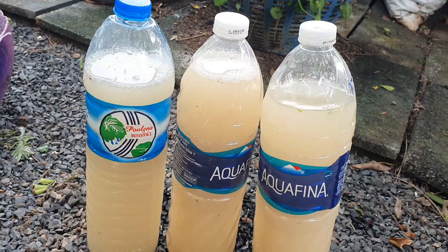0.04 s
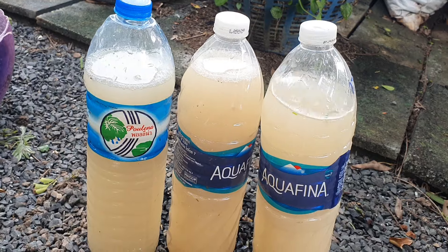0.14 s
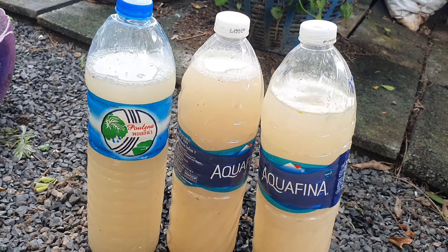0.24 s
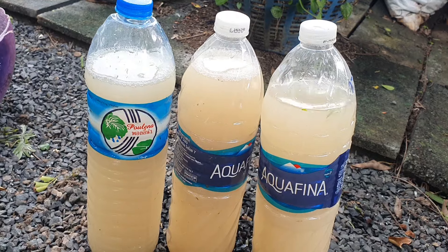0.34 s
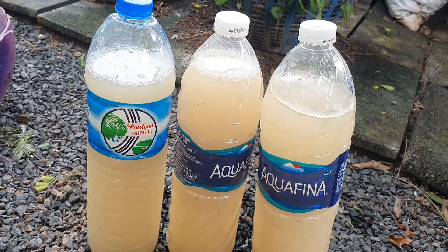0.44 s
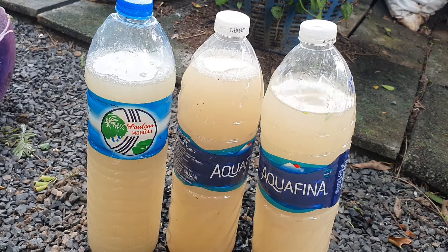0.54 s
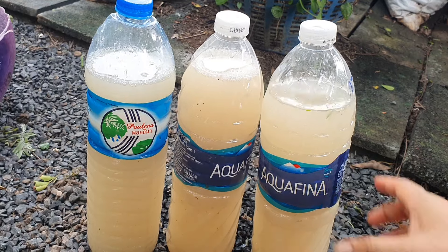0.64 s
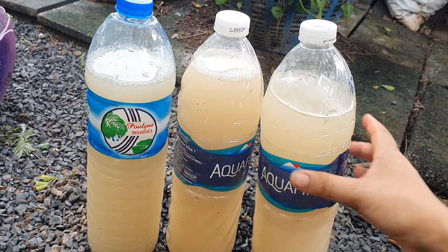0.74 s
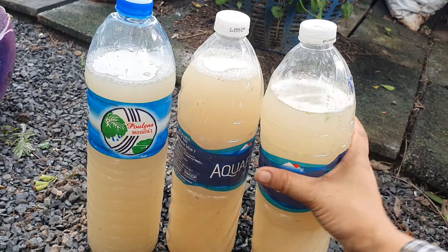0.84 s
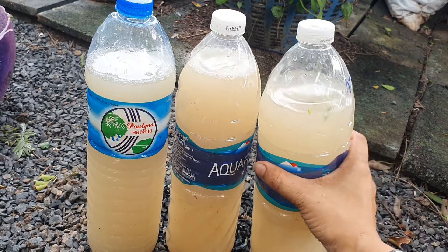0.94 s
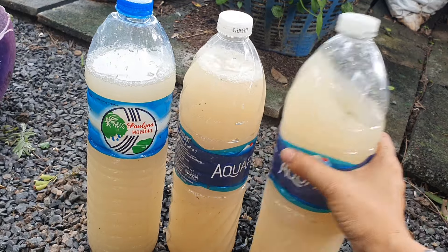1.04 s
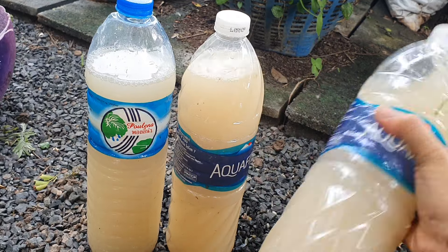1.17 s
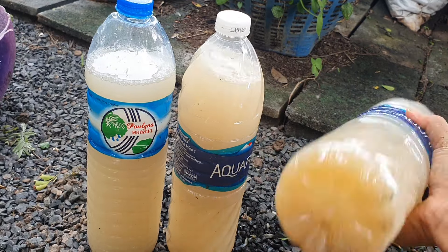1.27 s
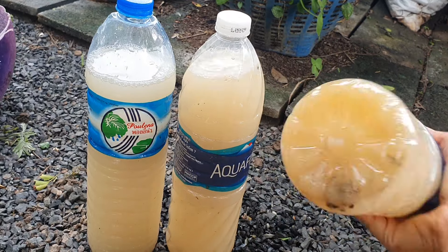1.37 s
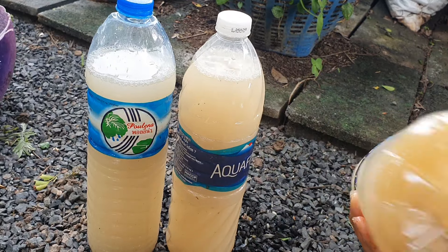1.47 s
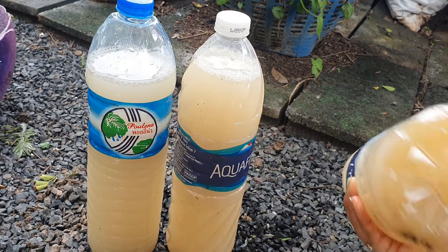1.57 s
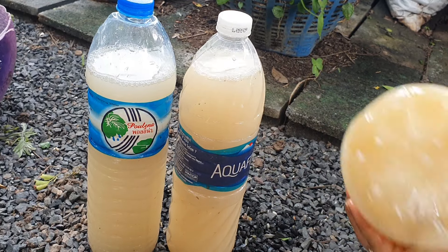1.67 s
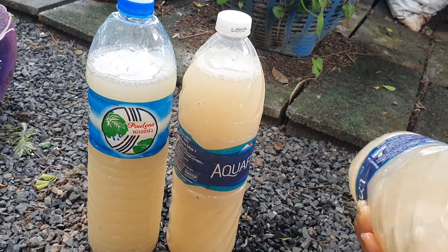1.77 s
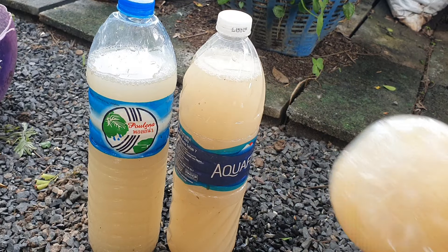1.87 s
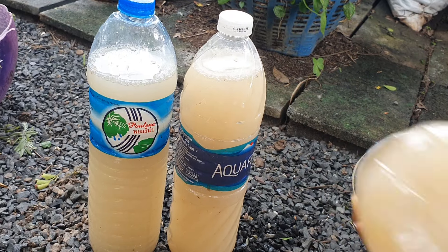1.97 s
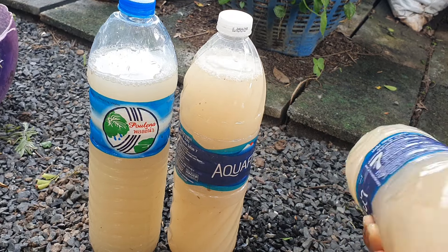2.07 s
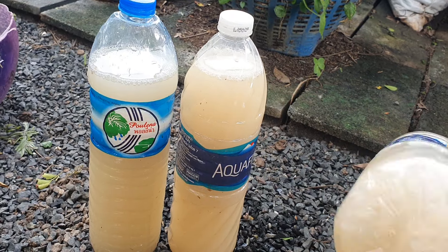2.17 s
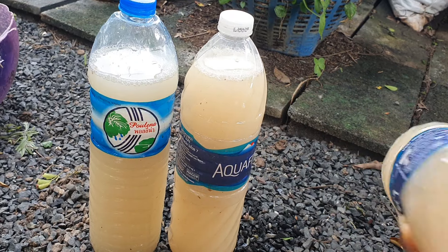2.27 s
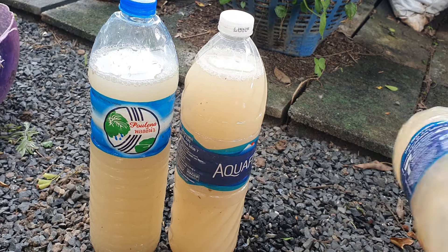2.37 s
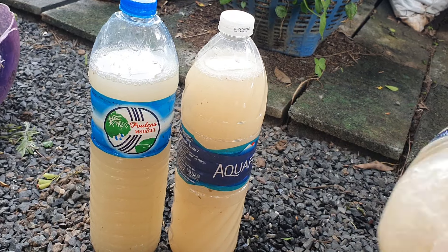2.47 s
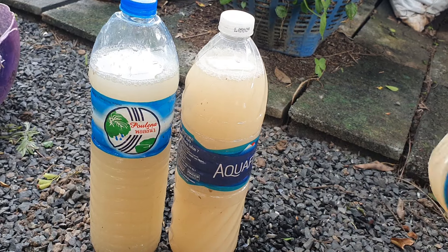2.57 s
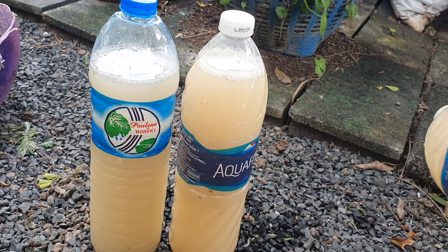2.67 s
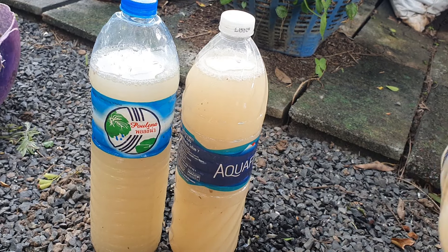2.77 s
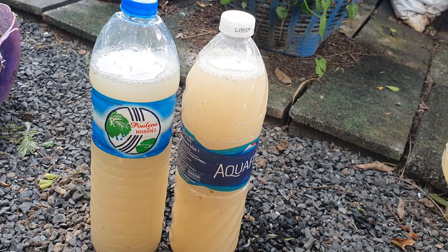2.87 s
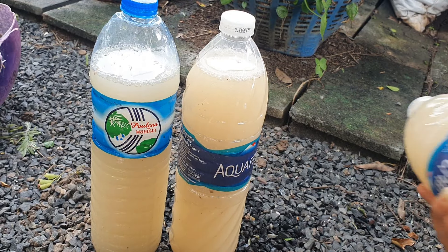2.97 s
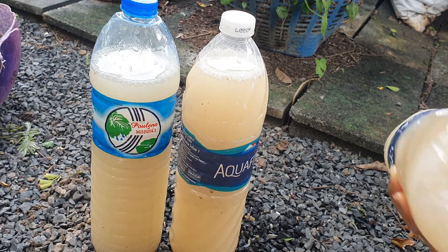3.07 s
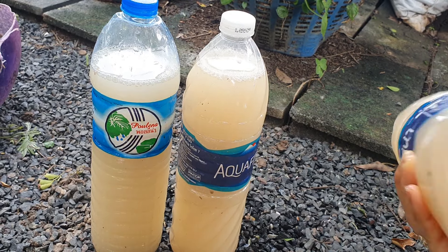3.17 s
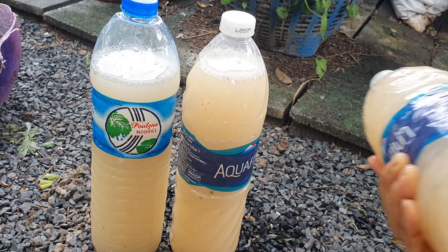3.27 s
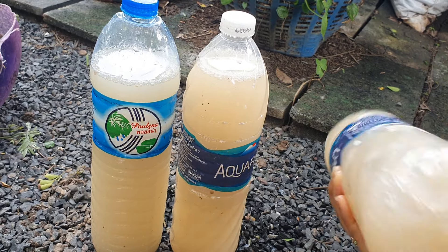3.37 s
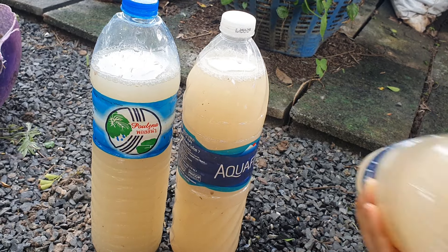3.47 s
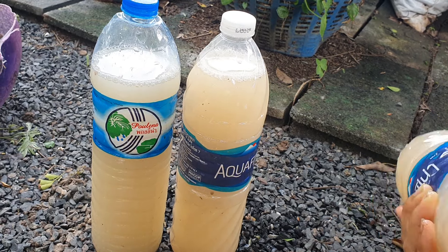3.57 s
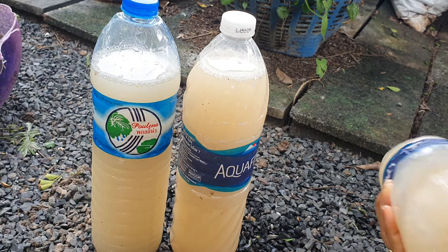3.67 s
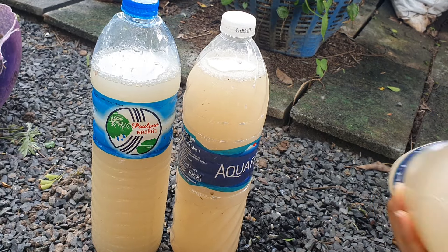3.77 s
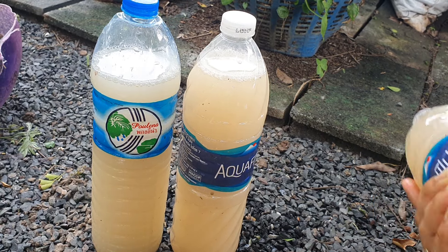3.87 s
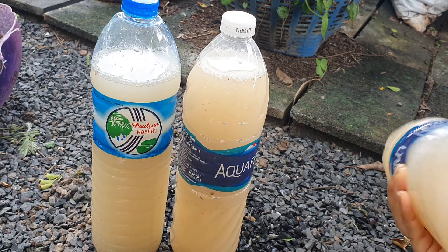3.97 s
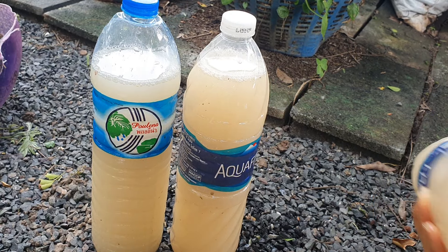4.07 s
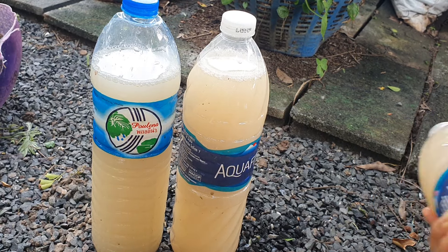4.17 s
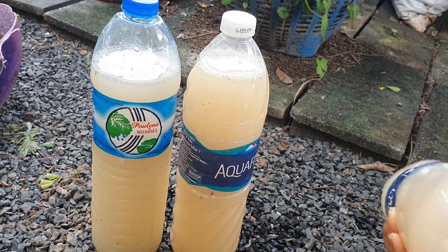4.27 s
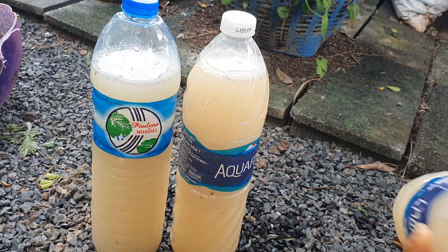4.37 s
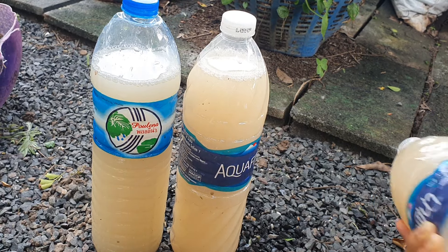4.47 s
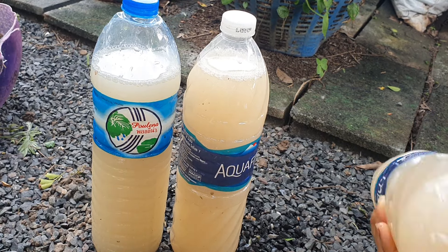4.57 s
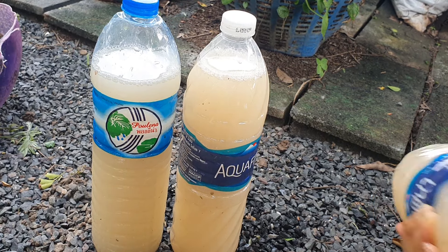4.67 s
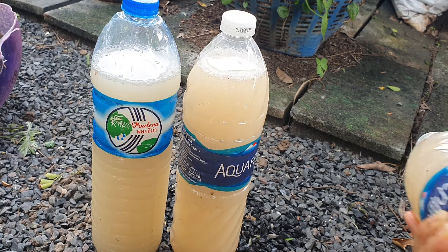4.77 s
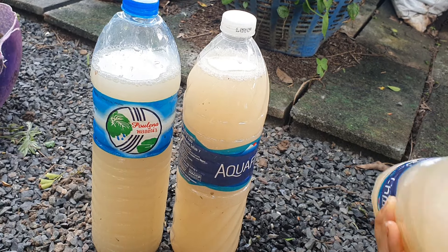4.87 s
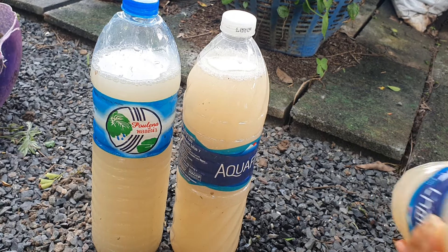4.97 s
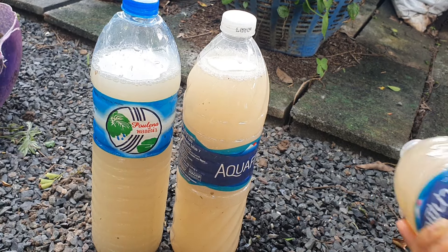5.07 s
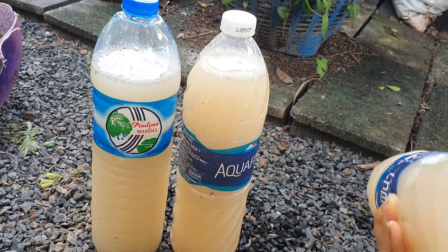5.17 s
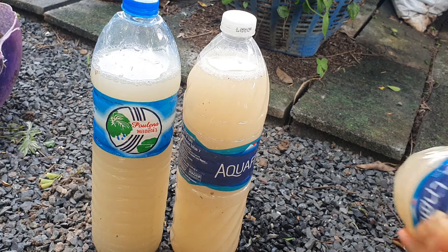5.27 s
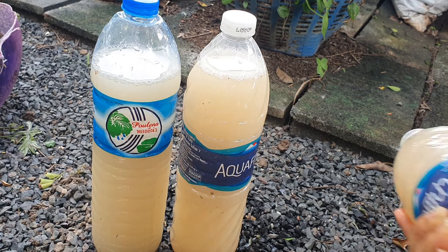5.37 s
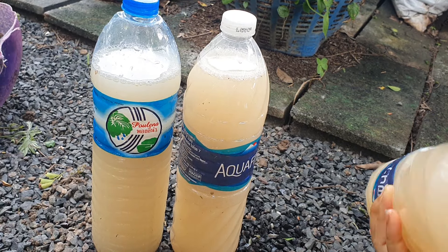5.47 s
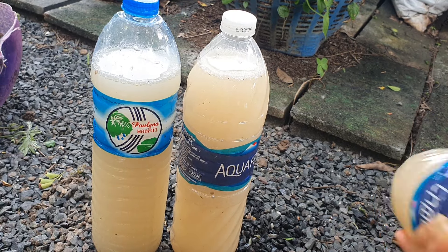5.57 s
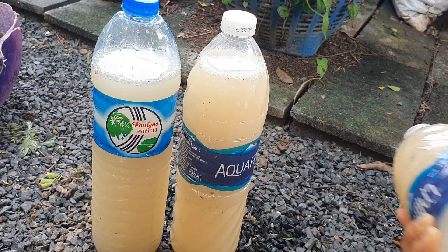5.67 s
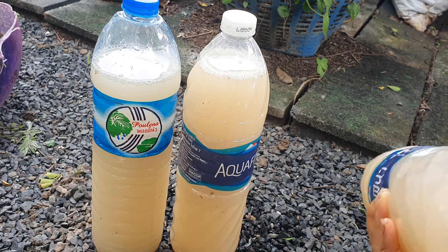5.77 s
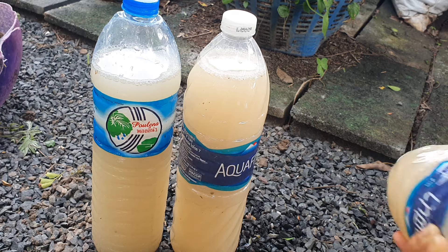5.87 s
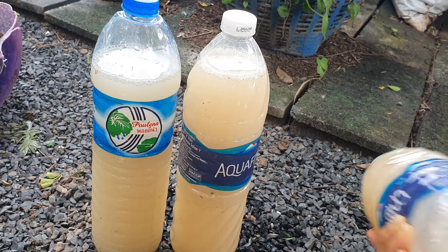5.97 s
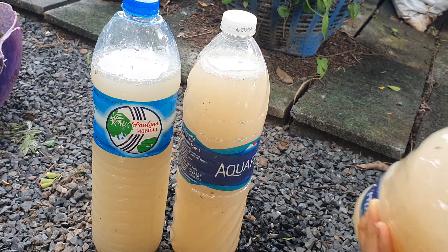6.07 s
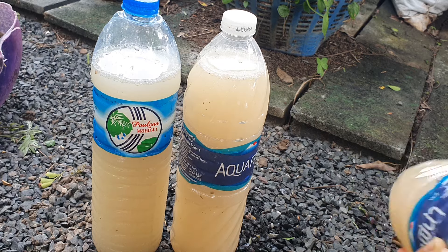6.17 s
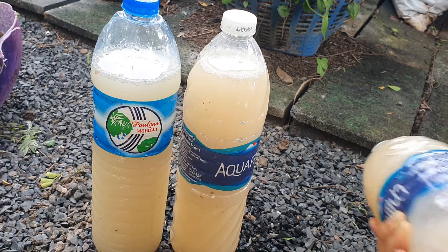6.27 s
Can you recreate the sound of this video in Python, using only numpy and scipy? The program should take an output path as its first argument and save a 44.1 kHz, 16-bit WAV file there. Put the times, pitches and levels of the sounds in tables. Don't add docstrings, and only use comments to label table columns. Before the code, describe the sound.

Wind buffets the stereo microphone in an open yard with very faint distant chirps. A soft brush of skin comes before a sudden burst of crinkling plastic, snapping and popping. Then fast vigorous shaking begins and never stops: watery swishes about seven a second, hollow slaps, bubbles, droplet ticks and small finger clicks on the wall, with blunt low wind thuds, mostly on the left.

```python
import sys
import numpy as np
from scipy import signal
from scipy.fft import rfft, irfft, next_fast_len
from scipy.io import wavfile
from scipy.ndimage import uniform_filter1d, map_coordinates

SR = 44100
rng = np.random.default_rng(int(sys.argv[2]) if len(sys.argv) > 2 else 0)


def convert_level_to_amplitude(level_db):
    exponent = np.asarray(level_db, float) / 20
    return 10 ** exponent


def pcm_store(signal):
    levels = np.round(np.clip(np.atleast_2d(signal), -1, 1) * 32767)
    wavfile.write(sys.argv[1], SR, levels.astype(np.int16).T)


N = 278712

# f/Hz, level/dB per Hz
YARD_SPECTRUM = [(180, -57), (300, -9), (531, -4), (820, -7), (1400, -12.5), (2650, -10.5), (3190, -8.5),
                 (6030, -9.5), (8020, -22.5), (14000, -29), (16500, -51)]
# f/Hz, left minus right/dB
YARD_BALANCE = [(60, 4), (110, 1.5), (200, 11), (380, -4), (700, 4), (1290, 0.5), (2380, 1), (4400, -2),
                (8120, 8.5), (15000, 25)]
# t/s, level/dB, f/Hz, length/s
CALLS = [
    (0.266, -45, 925, 0.0091),
    (.41, -61, 3230, 0.06),
    (.45, -59, 3170, 0.064),
    (1.31, -54, 3280, 0.053),
]
# t/s, left level/dB, right level/dB
GUSTS = [(0, -34.5, -37.5), (.55, -31, -31), (.92, -33, -31), (1.1, -29.5, -28.5), (1.3, -35.5, -36),
         (2.35, -29, -28.5), (2.68, -33.5, -30.5), (2.98, -30.5, -32.5), (3.12, -33.5, -30),
         (3.2, -29.5, -36), (3.35, -40, -36), (3.42, -28, -42), (3.72, -32.5, -39), (3.93, -31.5, -27.5),
         (5.05, -27, -28), (5.25, -36.5, -31), (5.62, -21.5, -33), (5.94, -28, -26), (6.03, -63, -36)]
# t/s, peak/dB, port (0 left, 1 right), width/ms, push before over suck
EDDIES = [(0.783, -14.5, 1, 2.83, 0.37), (2.412, -18, 1, 2.9, 1.1), (3.183, -7, 0, 2.9, 0),
          (3.245, -10.5, 0, 4, 0.19), (3.258, -4.5, 0, 4.5, 0.029), (3.29, -11.5, 0, 2.9, 0.46),
          (3.296, -15, 0, 1.9, 0.11), (3.311, -5.5, 0, 2.73, 0.67), (3.324, -4, 0, 3, 0),
          (3.336, -14, 0, 4.6, 0), (3.581, -11, 0, 3.8, 0), (3.954, -17, 1, 4.1, 0.42),
          (3.97, -11.5, 1, 5.1, 0.13), (4.078, -13.5, 0, 3.1, 0), (4.377, -15, 0, 1.85, 0.76),
          (4.39, -9.5, 0, 6.5, 0.36), (4.511, -8.5, 0, 3.4, 0), (4.528, -11.5, 0, 2.2, 0.12),
          (4.539, -11, 0, 4, 0.32), (4.979, -17, 0, 3.3, 0.17), (4.987, -16, 1, 6.1, 0.2),
          (5.005, -12.5, 1, 2.6, 0.56), (5.488, -12, 0, 2.4, 1.1), (5.501, -13.5, 0, 2.2, 0.82),
          (5.518, -11, 0, 6.1, 0.95), (5.575, -12, 0, 2.5, .3), (5.628, -7, 0, 2.54, 0.52),
          (5.64, -13, 0, 5.1, 0), (5.653, -12.5, 0, 2.1, 0.23), (5.666, -9, 0, 4.1, 0.65),
          (5.683, -13, 0, 3.8, 0.61), (5.735, -7, 0, 2.45, 1.36), (5.746, -15, 0, 2.6, 0),
          (5.759, -14, 0, 2.05, .6), (5.826, -11.5, 0, 3.4, 0.69), (5.842, -15.5, 0, 1.9, 0.21),
          (5.908, -14, 1, 2.3, 0.22), (5.932, -13.5, 0, 2.6, 0.31)]
# f/Hz, level/dB per Hz
BUFFET_SPECTRUM = [(12, -45), (20, -82), (43, -1), (92, -2), (165, -19.5), (238, -38), (271, -42),
                   (450, -34), (580, -63), (990, -120)]
# f/Hz, level/dB per Hz
FLUTTER_SPECTRUM = [(60, -4), (110, -8), (160, 2.5), (260, -5), (400, -28), (700, -55)]
# t/s, peak/dB, ring f/Hz, edge level/dB, t60/s
BUCKLES = [(1.0172, -36.5, 4320, -5, 0.079), (1.051, -12.5, 3700, -5, 0.038),
           (1.0562, -5.5, 3270, -2.5, 0.022), (1.0974, -17, 6160, 3, 0.0088),
           (1.106, -19, 2060, -10, 0.042), (1.2188, -38.5, 2430, -19, 0.089),
           (1.2504, -38, 1960, 17, 0.063), (1.268, -30.5, 4440, 9.5, 0.052),
           (1.278, -23.5, 5430, -8, 0.023), (1.304, -37, 5170, -19, 0.026), (1.34, -24, 6030, -8, 0.0076),
           (1.3554, -17.5, 1650, -12, 0.014), (1.3771, -11, 1460, -9.5, 0.019),
           (1.3943, -5, 1350, -11, 0.021), (1.4135, -15, 1050, -32, 0.035), (1.4187, -17, 1470, -28, 0.025),
           (1.429, -26, 5660, 3, 0.061), (1.512, -13.5, 6200, -18, 0.01)]
# t/s, peak/dB, f/Hz, t60/s
POP_BACKS = [
    (0.938, -39, 450, 0.037),
    (1.109, -26.5, 520, 0.053),
    (1.3685, -4.5, 236, 0.014),
    (5.424, 0.5, 470, 0.0046),
    (1.3944, -15, 880, 0.0035),
]
# f/Hz, width/Hz, level/dB
WALL_MODES = [(553, 320, 3.5), (1056, 140, 6.5), (1650, 790, 6.5), (2430, 950, 8.5), (3500, 1800, 1.5),
              (5700, 1900, 0.5)]
# f/Hz, level/dB, t60/s
PANEL_MODES = [(655, -5, 0.023), (1050, -5, 0.028), (1320, -16, 0.036), (1650, -5, 0.028),
               (1960, -12.5, .025), (2330, -14, 0.016), (2900, -13, 0.022), (3330, -1, 0.012),
               (3700, -6, 0.012), (4400, -20, .02)]
# f/Hz, left minus right/dB
BOTTLE_BALANCE = [(60, -3), (110, -1), (200, -2.5), (380, -2.5), (700, -3), (1290, -0.5), (2380, -2.5),
                  (4400, -5), (8120, -1), (15000, 6)]
# f/Hz, likeness
LIKENESS = [(300, 1), (1000, 0.77), (2500, 0.65), (5000, 0.021), (10000, 0.51), (15000, 0.11)]
# t/s, peak/dB
LANDINGS = [(1.059, -30), (1.377, -29), (1.415, -32.5), (1.645, -36), (1.832, -33.5), (2.197, -45),
            (2.265, -44), (2.512, -28.5), (2.541, -25), (2.832, -30), (3.469, -36.5), (3.625, -32)]
# t/s, peak/dB, f/Hz
BIG_BUBBLES = [(1.98, -14, 1050), (2.195, -23.5, 595), (2.269, -18, 525), (2.765, -24, 1480),
               (2.929, -22, 536), (2.961, -21, 473), (3.0, -27, 937), (3.053, -25, 958),
               (3.153, -21.5, 685), (3.172, -18, 725), (3.301, -25, 401), (3.63, -13, 1310),
               (3.767, -19.5, 1420), (3.857, -24, 470), (3.8576, -13, 1300), (3.949, -20.5, 589),
               (4.077, -20.5, 1110), (4.099, -18, 676), (4.332, -25, 694), (4.419, -19, 579),
               (4.448, -25, 530), (4.496, -24, 431), (4.628, -30, 960), (4.648, -30, 1070),
               (4.737, -22, 1310), (4.748, -21.5, 484), (4.818, -30, 401), (4.859, -22, 894),
               (5.051, -28, 525), (5.103, -18, 447), (5.52, -26, 859), (5.551, -22, 738), (5.677, -18, 980),
               (5.785, -23, 522), (6.005, -21, 450), (6.073, -27, 684), (6.233, -29, 450),
               (6.258, -22, 458)]
# t/s, peak/dB, f/Hz
DROPLETS = [(1.5864, -17, 4480), (1.666, -21, 3320), (1.9381, -27, 2540), (1.9804, -8.5, 2770),
            (2.238, -24, 3310), (2.254, -19, 3110), (2.2976, -21, 4310), (2.414, -13.5, 3280),
            (2.544, -7.5, 3500), (2.6633, -24, 3220), (2.682, -17, 2820), (2.8275, -24, 4430),
            (2.828, -19, 2680), (2.96, -10.5, 6030), (3.2755, -17.5, 3240), (3.298, -31, 4180),
            (3.4586, -28, 2520), (3.6106, -13.5, 4750), (3.7016, -26, 3460), (3.856, -16, 4220),
            (3.9686, -10.5, 4940), (4.0607, -23, 5020), (4.077, -30, 3640), (4.127, -26, 3610),
            (4.1894, -25, 5720), (4.2094, -28, 3010), (4.352, -25, 3500), (4.4189, -21, 2850),
            (4.6499, -24, 6030), (4.715, -15, 5710), (4.7247, -15.5, 3800), (4.837, -24, 4230),
            (4.943, -19, 2880), (5.0131, -17, 4250), (5.0964, -14.5, 6000), (5.1425, -22, 3180),
            (5.2026, -25, 3040), (5.2416, -24, 4660), (5.29, -20, 4050), (5.378, -23, 3100),
            (5.424, -23, 3630), (5.5504, -17, 3330), (5.652, -19, 4020), (5.6766, -19, 3530),
            (5.9012, -17, 4600), (6.0033, -22, 3430), (6.145, -18, 4880), (6.1734, -22, 5670)]
# t/s, peak/dB, f/Hz
CLEAR_BUBBLES = [(2.0, -34, 1960), (2.143, -40, 1590), (2.16, -45, 1580), (2.252, -40, 950),
                 (2.265, -30.5, 703), (2.358, -41, 1200), (2.39, -33, 1240), (2.61, -33, 1295),
                 (3.725, -36, 1330), (3.01, -36, 980), (4.645, -30, 2070), (4.722, -28, 3420),
                 (4.769, -33, 2380), (5.97, -33, 1390), (6.0, -32, 1260), (6.115, -38, 1144),
                 (4.514, -44, 1640), (5.360, -34, 1590), (5.387, -36, 1340), (5.678, -27.5, 1806),
                 (5.910, -34, 1540)]
# t/s, peak/dB, cavity f/Hz, splash level/dB
WALL_SLAPS = [(1.586, -26, 4400, 5.5), (1.833, -13, 1070, -16), (1.98, -12, 2480, -12.5),
              (2.1, -23.5, 510, -8), (2.256, -13, 960, -5), (2.413, -21, 497, -5), (2.545, -9, 530, -2.5),
              (2.589, -12.5, 1470, -5.5), (2.831, -11.5, 696, 0.5), (2.875, -18, 616, -7),
              (3.129, -17, 710, -3.5), (3.469, -16.5, 616, -4), (3.611, -21, 1190, -2.5),
              (3.969, -17.5, 800, 2.5), (4.075, -12.5, 3750, -19), (4.21, -21, 596, 1),
              (4.652, -28, 1050, 10), (4.836, -26.5, 4000, 5), (4.946, -9.5, 1110, -7.5),
              (5.012, -15, 4250, -9), (5.098, -22.5, 483, -2.5), (5.24, -29, 1020, -12),
              (5.552, -18, 760, 3), (6.004, -19, 1190, 1)]
# t/s, peak/dB, cavity f/Hz, splash level/dB
FLAT_SMACKS = [
    (2.963, -24, 865, 6.5),
    (3.275, -14.5, 805, -8.5),
    (3.8567, -15, 4000, 3),
    (4.419, -15.5, 900, -1),
    (5.141, -16, 870, 3),
]
# t/s, peak/dB, cavity f/Hz
AIR_POCKETS = [(1.567, -9.5, 2060), (1.647, -15, 810), (2.393, -15, 536), (2.522, -15, 550),
               (2.662, -10.5, 3140), (2.916, -6, 3730), (2.992, -18, 950), (3.096, -16, 760),
               (3.33, -13, 626), (3.353, -12.5, 805), (3.458, -11, 2430), (3.514, -16, 540),
               (3.548, -13.5, 1290), (3.928, -14, 650), (4.038, -19, 627), (4.127, -10.5, 3700),
               (4.189, -6, 5340), (4.33, -18, 655), (4.353, -17, 630), (4.715, -14, 3280),
               (5.291, -8, 3970), (5.651, -6.5, 3700), (5.678, -5.5, 1870), (5.975, -11.5, 1350),
               (6.12, -12.5, 1080), (6.17, -10, 5300), (6.283, -18, 520)]
# t/s, peak/dB
FINGER_TICKS = [(1.596, -11), (2.081, -12.5), (2.102, -18), (2.573, -29), (2.586, -12), (2.8239, -17),
                (2.8763, -8), (3.003, -11.5), (3.459, -16), (3.6007, -21), (4.0591, -19), (4.7136, -22),
                (4.498, -26), (4.0446, -24), (4.0835, -11), (4.2105, -9), (4.353, -18), (4.422, -14),
                (4.9925, -10), (5.382, -18), (5.4237, -10), (5.5243, -15), (5.5512, -14), (5.576, -9.5),
                (5.623, -3), (5.497, -19), (6.146, -12), (6.2591, -23), (6.2824, -14)]
# f/Hz, level/dB per Hz
SPRAY_SPECTRUM = [(530, -94), (900, -4.5), (1760, -5), (2560, -4.5), (3520, -7.5), (5860, -8),
                  (6950, -14.5), (7450, -26), (13100, -26.5), (15200, -31), (16500, -64)]
# f/Hz, level/dB per Hz
GURGLE_SPECTRUM = [(150, 10), (280, 1.5), (500, 8.5), (1000, -18.5), (1800, -9), (3500, -21)]
# start t/s, hold/s, spray level/dB, gurgle over spray/dB
LIQUID_SURGES = [(1.394, 0.084, -37, -0.5), (1.685, 0.047, -33.5, 2), (1.955, 0.067, -33.5, -2),
                 (2.251, 0.053, -28.5, -1), (2.525, 0.1, -32.5, -3.5), (2.768, 0.014, -35, -1.5),
                 (3.004, 0.048, -34, -2.5), (3.302, 0.1, -36.5, -2.5), (3.578, 0.09, -35.5, -3),
                 (3.855, 0.11, -36, -0.5), (4.204, 0.1, -37.5, -3), (4.485, 0.078, -37, 0),
                 (4.833, 0.0095, -30.5, -4), (5.082, 0.052, -31.5, -1), (5.389, 0.045, -30, -2),
                 (5.549, 0.19, -33.5, -5.5), (5.902, 0.11, -36, -0.5), (6.226, 0.067, -36, 2.5),
                 (1.585, 0.02, -33.5, -2.5), (1.784, 0.1, -34, -1.5), (2.08, 0.1, -38.5, 1),
               (2.378, 0.1, -34.5, -2), (2.686, 0.019, -31.5, -2.5), (2.82, 0.11, -35, -3.5),
               (3.1, 0.13, -38, -3), (3.453, 0.057, -32, 0.5), (3.702, 0.12, -35.5, -4),
               (4.069, 0.1, -35.5, -3), (4.361, 0.071, -31, -8.5), (4.641, 0.14, -33, -3),
               (4.965, 0.05, -31, -3.5), (5.244, 0.08, -30, -3.5), (5.482, 0.046, -40, 1.5),
               (5.841, 0.025, -30.5, -2.5), (6.11, 0.077, -37, -2)]


def unit(x):
    return x / np.sqrt(np.mean(x ** 2) + 1e-20)


def along(points, hz):
    f, v = np.transpose(points)
    return np.interp(np.log(hz + 1), np.log(f + 1), v)


def curves(rows):
    s, *cols = np.transpose(rows)
    return [np.interp(np.arange(N) / SR, s, c) for c in cols]


def wobble(rate):
    knots = rng.standard_normal(int(N * rate / SR) + 4)
    return map_coordinates(knots, [np.arange(N) * rate / SR])


def bursts(rate, decay_s):
    jumps = (rng.random(N) < rate / SR) * rng.exponential(size=N)
    rough = signal.lfilter([1], [1, -np.exp(-1 / (decay_s * SR))], jumps)
    return unit(rough - rough.mean())


def filtered(x, response):
    m = next_fast_len(N + SR // 2)
    return irfft(rfft(x, m) * response(np.fft.rfftfreq(m, 1 / SR)), m)[..., :N]


def coloured(x, spectrum):
    return unit(filtered(x, lambda hz: convert_level_to_amplitude(along(spectrum, hz))))


def side_of_7k(x, order, kind="low"):
    return signal.sosfilt(signal.butter(order, 7000, kind, fs=SR, output="sos"), x)


def resonances(modes):
    def response(f):
        total = 0
        for k, (centre, width, db) in enumerate(modes):
            damping = 1j * f * width
            total = total + (-1) ** k * convert_level_to_amplitude(db) * damping / (centre ** 2 - f ** 2 + damping)
        return total
    return response


def patches(x, depth, bins, frames):
    z = signal.stft(x, nperseg=256)[2]
    field = uniform_filter1d(rng.standard_normal(z.shape), size=bins, axis=0)
    field = uniform_filter1d(field, size=frames, axis=1)
    return signal.istft(z * np.exp(depth * unit(field)), nperseg=256)[1][:N]


def add(track, s, sound):
    part = track[round(s * SR):][:len(sound)]
    part += sound[:len(part)]


def ports(x, other, lag_s):
    turn = lambda hz: np.arccos(np.clip(along(LIKENESS, hz), -1, 1)) / 2
    mid, side = filtered(np.array([x, other]), lambda hz: np.array([np.cos(turn(hz)), 1j * np.sin(turn(hz))]))
    half = np.array([[.5], [-.5]])

    def shift(hz):
        return convert_level_to_amplitude(half * along(BOTTLE_BALANCE, hz)) * np.exp(-2j * np.pi * hz * lag_s * half)
    return filtered(np.array([mid + side, mid - side]), shift)


def yard():
    hiss = coloured(rng.standard_normal((2, N)), YARD_SPECTRUM)
    half = np.array([[.5], [-.5]])
    hiss = filtered(hiss, lambda hz: convert_level_to_amplitude(along(YARD_BALANCE, hz) * half))
    calls = np.zeros(N)
    for s, db, hz, length in CALLS:
        t = np.arange(round(length * SR)) / SR
        add(calls, s, convert_level_to_amplitude(db) * np.hanning(len(t)) * np.sin(2 * np.pi * hz * t))
    drift_db = .5 * wobble(6)
    return convert_level_to_amplitude(-53.5 + drift_db) * hiss + calls


def wind():
    level_db = np.array(curves(GUSTS))
    calm_db = -26.5
    flutter_db = -9 + 0.79 * (level_db - calm_db)
    lumps = convert_level_to_amplitude(3.06 * np.array([wobble(25), wobble(25)]))
    buffet = unit(lumps * coloured(rng.standard_normal((2, N)), BUFFET_SPECTRUM))
    flutter = unit(lumps * coloured(rng.standard_normal((2, N)), FLUTTER_SPECTRUM))
    thumps = np.zeros((2, N))
    ms = np.arange(SR // 20) / SR * 1000 - 15
    bump = lambda widths, at, wide: np.exp(-((widths - at) / wide) ** 2)
    for s, db, port, width_ms, push in EDDIES:
        u = ms / width_ms
        shape = push * bump(u, -1.04, 0.38) - bump(u, 0, 0.53) + 0.9 * bump(u, 1.93, 1.2)
        add(thumps[int(port > .5)], s - .015, convert_level_to_amplitude(db) * shape)
    low_cut = filtered(thumps, lambda f: f ** 4 / (42 ** 4 + f ** 4))
    return (buffet + convert_level_to_amplitude(flutter_db) * flutter) * convert_level_to_amplitude(level_db) + low_cut


def touch():
    start_s, length_s = 0.928, 0.075
    u = np.clip((np.arange(N) / SR - start_s) / length_s, 0, 1)
    rub = coloured(rng.standard_normal((2, N)) * convert_level_to_amplitude(3.2 * wobble(153)), SPRAY_SPECTRUM)
    return convert_level_to_amplitude(-56) * np.sqrt(np.sin(np.pi * u) + 1e-12) * rub


def panel_ring(hz, t):
    reach_octaves = 0.82
    ring = np.zeros(len(t))
    for k, (f, level, decay) in enumerate(PANEL_MODES):
        far_db = 6.3 * (np.log2(f / hz) / reach_octaves) ** 2
        ring += (-1) ** k * convert_level_to_amplitude(level - far_db - 60 * t / decay) * np.sin(2 * np.pi * f * t)
    return ring


def cracks():
    snap, rattle, edge = np.zeros((3, N))
    t = np.arange(SR // 8) / SR
    for s, db, hz, edge_db, t60 in BUCKLES:
        noise = rng.standard_normal((3, len(t)))
        decay = convert_level_to_amplitude(-60 * t / (.5 * t60))
        band = signal.lfilter(*signal.iirpeak(hz, 2.2, SR), noise[2] * decay)
        ping = 0.39 * np.sin(2 * np.pi * hz * t) * decay
        add(snap, s, convert_level_to_amplitude(db - 5.5) * (band / np.abs(band).max() + ping))
        if hz < 4000 and db > -30:
            add(snap, s, -convert_level_to_amplitude(db - 7.5) * panel_ring(hz, t))
        if hz < 4000:
            u = t * 1000 / 0.5
            add(snap, s, -convert_level_to_amplitude(db - 3) * np.sin(2 * np.pi * u) * np.exp(-u))
        size_db = db - 8 * np.log2(max(hz / 3500, 1))
        rattle_gain = convert_level_to_amplitude(size_db - 9.5 - 60 * t / t60) + convert_level_to_amplitude(size_db - 23.0 - 60 * t / 0.11)
        add(rattle, s, noise[0] * rattle_gain)
        sharp_db = db + edge_db
        edge_gain = convert_level_to_amplitude(sharp_db - 5.5 - 60 * t / 0.0027) + convert_level_to_amplitude(sharp_db - 29.5 - 60 * t / 0.13)
        add(edge, s, noise[1] * edge_gain)
    for s, db, hz, t60 in POP_BACKS:
        onset = 1 - np.exp(-t / 0.0021)
        add(snap, s, -convert_level_to_amplitude(db - 1.5 - 60 * t / t60) * onset * np.sin(2 * np.pi * hz * t))
    body = snap + filtered(rattle, resonances(WALL_MODES))
    return side_of_7k(body, 8) + side_of_7k(edge, 3, "high")


def mass():
    out, t = np.zeros(N), np.arange(SR // 8) / SR
    boom_hz, boom_t60 = 188, 0.083
    plop_cycles, drop_cycles = 7, 22
    blip_s, blip_rise = 0.014, 0.014
    for s, db in LANDINGS:
        turns = boom_hz * 2 ** (0.07 * rng.standard_normal()) * t
        onset = 1 - np.exp(-t / 0.0008)
        add(out, s, convert_level_to_amplitude(db - 60 * t / boom_t60) * onset * np.sin(2 * np.pi * turns))
    for s, db, hz in BIG_BUBBLES:
        add(out, s, -convert_level_to_amplitude(db - 6 - 60 * hz * t / plop_cycles) * np.sin(2 * np.pi * hz * t))
    for s, db, hz in DROPLETS:
        add(out, s, convert_level_to_amplitude(db - 8.5 - 60 * hz * t / drop_cycles) * np.sin(2 * np.pi * hz * t))
    for s, db, hz in CLEAR_BUBBLES:
        u = np.clip(t / blip_s, 0, 1)
        add(out, s, convert_level_to_amplitude(db) * np.sin(np.pi * u) ** 2 * np.sin(2 * np.pi * hz * t * (1 + blip_rise * u)))
    return side_of_7k(out, 6)


def slaps():
    pops, splash, ticks = np.zeros((3, N))
    t = np.arange(SR // 8) / SR
    slap_t60, smack_t60 = 0.081, 0.039
    pocket_splash_db, pocket_cycles = -42, 41
    hits = [(*row, slap_t60) for row in WALL_SLAPS]
    hits += [(*row, smack_t60) for row in FLAT_SMACKS]
    hits += [(s, db, hz, pocket_splash_db, pocket_cycles / hz) for s, db, hz in AIR_POCKETS]
    for s, db, hz, splash_db, t60 in hits:
        noise = rng.standard_normal((2, len(t))) * (1 - np.exp(-t / 0.00022))
        pocket = signal.lfilter(*signal.iirpeak(hz, 3.2, SR), noise[0] * convert_level_to_amplitude(-60 * t / (1.53 * t60)))
        add(pops, s, convert_level_to_amplitude(db - 14.5) * pocket / np.abs(pocket).max())
        burst = convert_level_to_amplitude(-3.0 - 60 * t / t60) + convert_level_to_amplitude(-6.5 - 60 * t / 0.0039)
        add(splash, s, convert_level_to_amplitude(db + splash_db + 1.0) * burst * noise[1])
    for s, db in FINGER_TICKS:
        add(ticks, s, convert_level_to_amplitude(db - 23.5 - 60 * t / 0.013) * rng.standard_normal(len(t)))
    ticks = filtered(ticks, lambda f: (1j * f / (3500 + 1j * f)) ** 2)
    return side_of_7k(pops, 6) + ticks + filtered(splash, lambda hz: convert_level_to_amplitude(along(SPRAY_SPECTRUM, hz)))


def bubbles(count, hz, octaves, cycles, spread_db, rise, size):
    at, tone, big = rng.random(count), rng.standard_normal(count), rng.exponential(size=count)
    pitch = np.clip(hz * 2 ** (octaves * tone), 150, 9000)
    turns = pitch[:, None] * np.arange(size) / SR
    wave = np.sin(2 * np.pi * turns * (1 + rise * turns / cycles))
    wave *= np.exp(-turns / cycles) * (1 - np.exp(-2 * turns))
    wave *= convert_level_to_amplitude(spread_db * big)[:, None] * np.hanning(2 * size)[size:]
    where = (at * N).astype(int)[:, None] + np.arange(size)
    return unit(np.bincount(where.ravel(), wave.ravel(), N + size)[:N])


def surges(rise_db, fall_db, gurgle):
    sag_db, froth_db = 6.5, -52
    s, hold, db, rel_db = np.transpose(LIQUID_SURGES)[..., None]
    t = np.arange(0, N + 64, 64) / SR
    u = t - s
    froth = convert_level_to_amplitude(2 * froth_db) * (t > s.min())
    shape_db = rise_db * np.minimum(u, 0) - sag_db * np.clip(u, 0, hold) - fall_db * np.maximum(u - hold, 0)
    power = np.sum(convert_level_to_amplitude(db + gurgle * rel_db + shape_db) ** 2, axis=0)
    return np.interp(np.arange(N) / SR, t, np.sqrt(power + froth))


def slosh():
    fizz = bubbles(count=5000, hz=2900, octaves=0.648, cycles=2.4, spread_db=3.0, rise=0.07, size=260)
    fizz = filtered(fizz, lambda hz: 1 / (1 + (hz / 6800) ** 16))
    sheet = patches(rng.standard_normal(N) * convert_level_to_amplitude(3.0 * wobble(440)), depth=0.28, bins=10, frames=7)
    spray = unit(coloured(sheet, SPRAY_SPECTRUM) + 0.56 * fizz)
    spray = spray * surges(rise_db=593, fall_db=349, gurgle=0)
    glugs = bubbles(count=2500, hz=751.4, octaves=0.748, cycles=4.0, spread_db=1.7, rise=0.07, size=800)
    gurgle = 0.55 * coloured(rng.standard_normal(N), GURGLE_SPECTRUM) + 0.8 * glugs
    gurgle = unit(patches(gurgle, depth=0.34, bins=3, frames=9))
    gurgle = gurgle * surges(rise_db=379, fall_db=309, gurgle=1.0)
    breaking = convert_level_to_amplitude(1.2 * np.minimum(bursts(rate=90, decay_s=0.016), 2) + 1.1 * wobble(160))
    return (convert_level_to_amplitude(-6.0) * spray + convert_level_to_amplitude(-7.5) * gurgle) * breaking


def scene():
    liquid, buckling, other = slosh() + mass(), cracks(), cracks()
    scattered = patches(liquid, depth=3j, bins=5, frames=9)
    shaken = ports(liquid + slaps(), 1.555 * scattered + slaps(), lag_s=.0002)
    lifted = np.arange(N) > 1.2 * SR
    grab = ports(buckling * ~lifted, 1.22 * other * ~lifted, lag_s=0.00006)
    grab = grab + ports(buckling * lifted, 1.08 * other * lifted, lag_s=0.00017)
    return convert_level_to_amplitude(6) * (shaken + grab) + wind() + yard() + touch()


def roll_off(x):
    return signal.sosfilt(signal.butter(12, 17080, fs=SR, output="sos"), x)


def record(dry):
    held = dry / (1 + np.abs(dry / .98) ** 8) ** (1 / 8)
    limited = filtered(held, lambda hz: 1 / (1 + (hz / 15820) ** 300))
    return roll_off(limited)


dry = scene()
out = record(dry)
pcm_store(out)
```